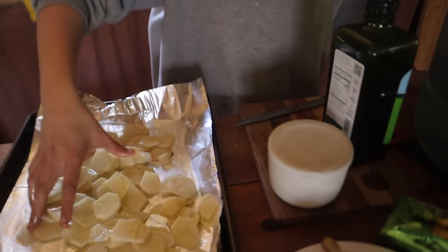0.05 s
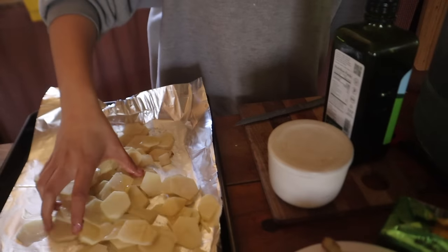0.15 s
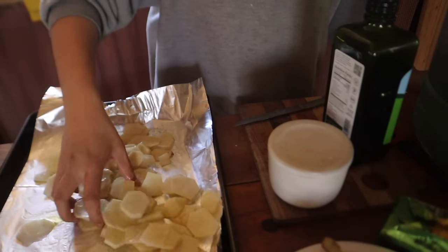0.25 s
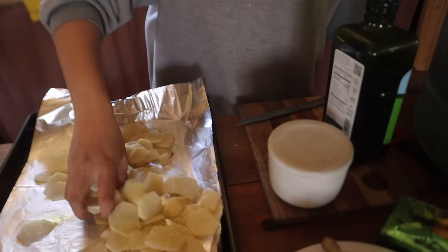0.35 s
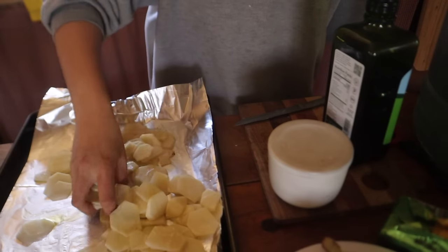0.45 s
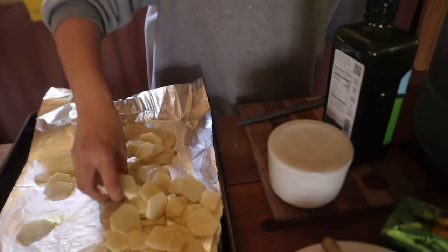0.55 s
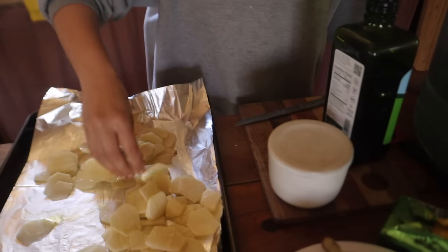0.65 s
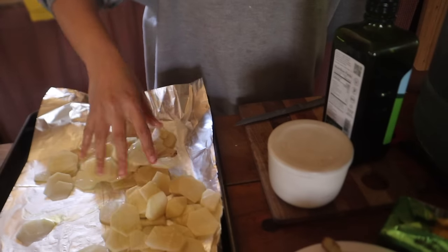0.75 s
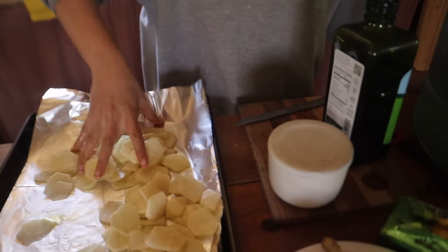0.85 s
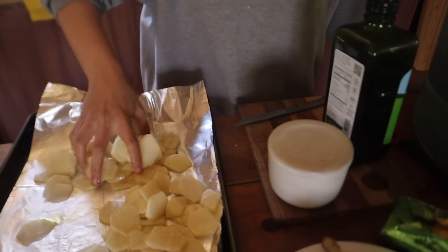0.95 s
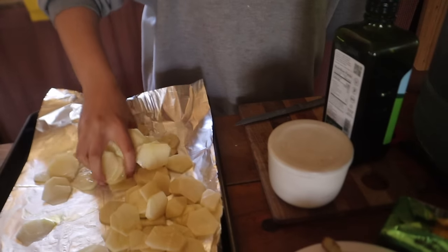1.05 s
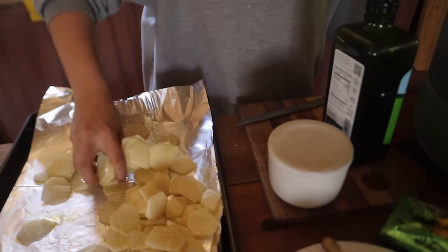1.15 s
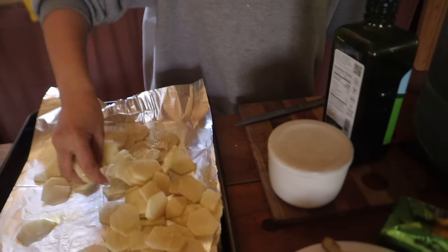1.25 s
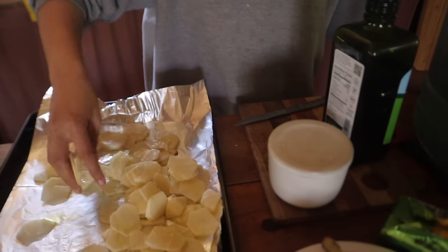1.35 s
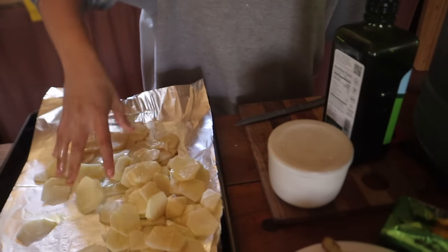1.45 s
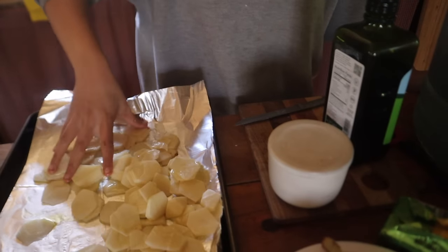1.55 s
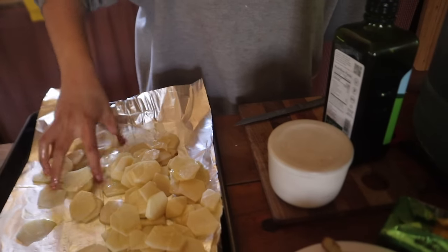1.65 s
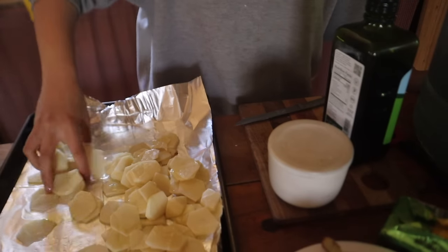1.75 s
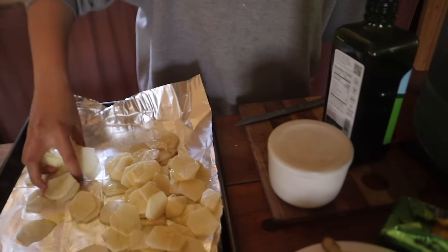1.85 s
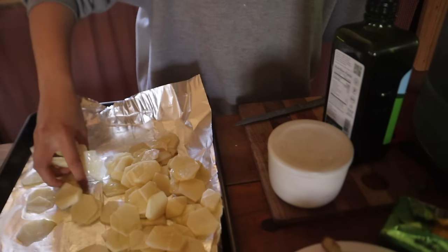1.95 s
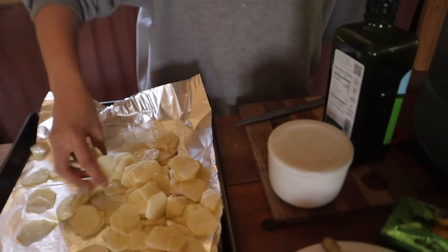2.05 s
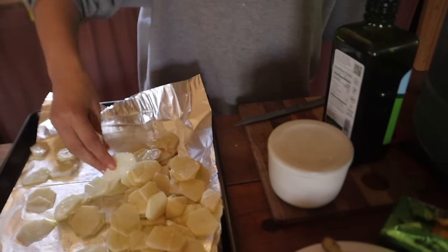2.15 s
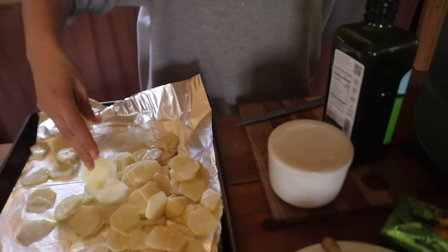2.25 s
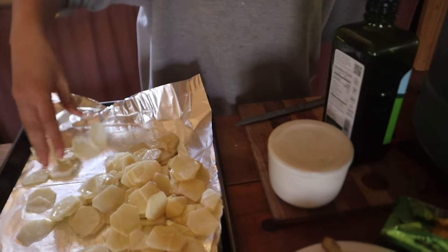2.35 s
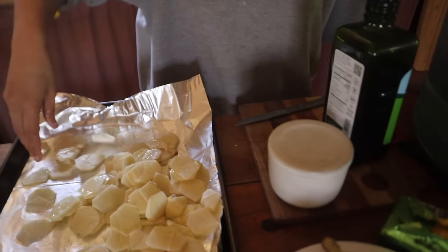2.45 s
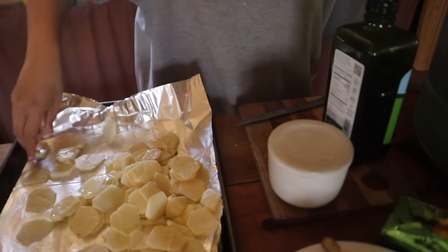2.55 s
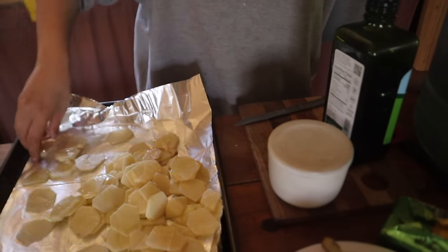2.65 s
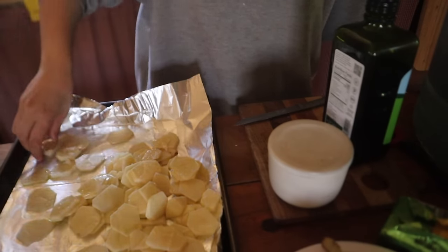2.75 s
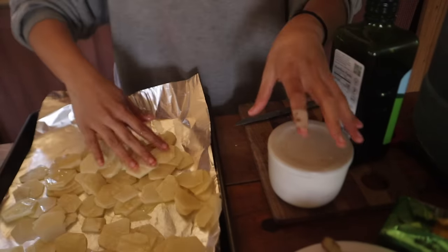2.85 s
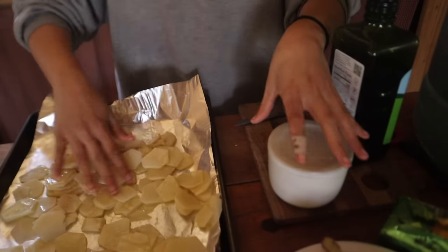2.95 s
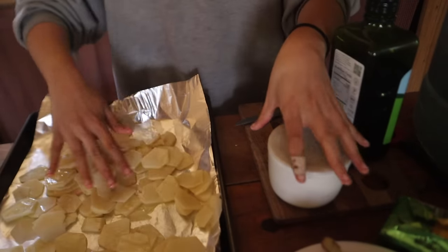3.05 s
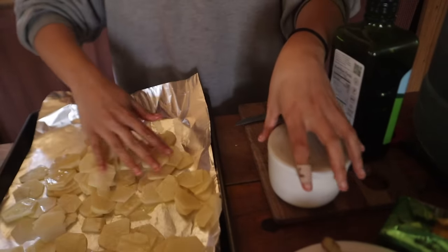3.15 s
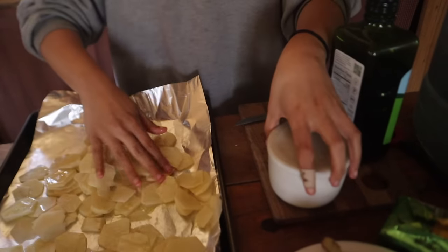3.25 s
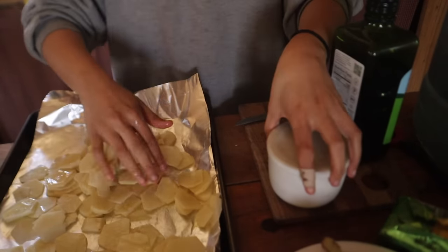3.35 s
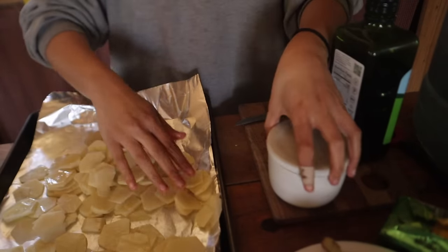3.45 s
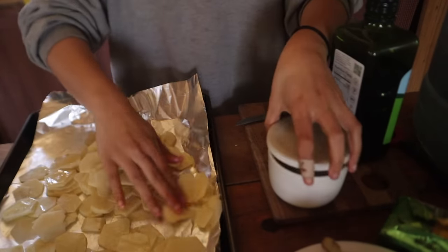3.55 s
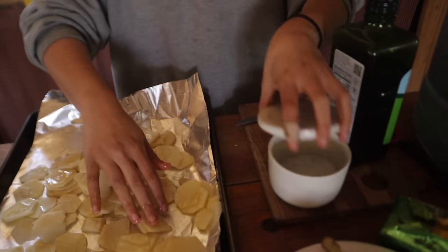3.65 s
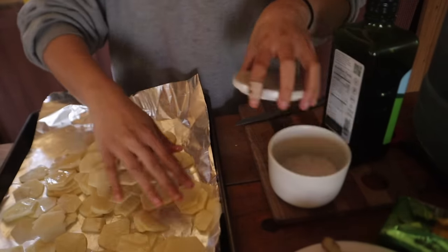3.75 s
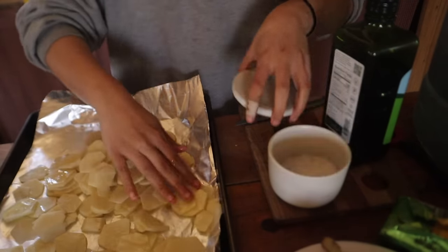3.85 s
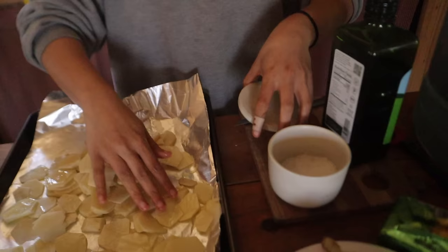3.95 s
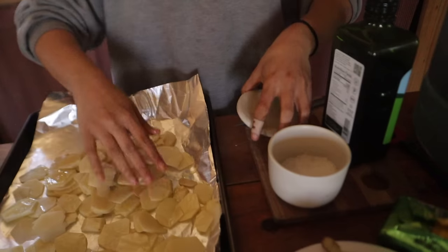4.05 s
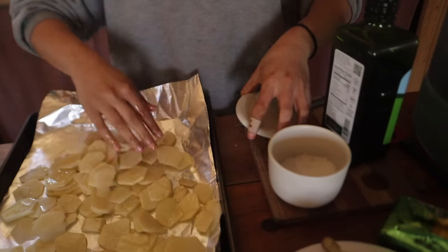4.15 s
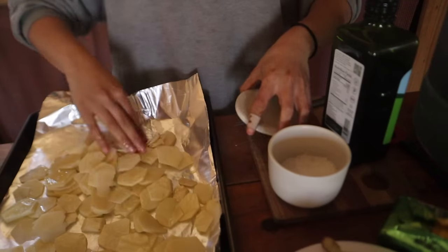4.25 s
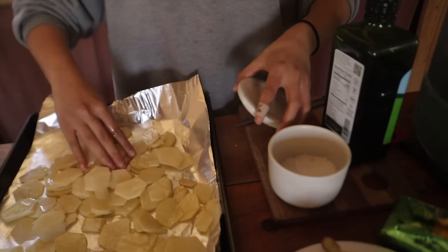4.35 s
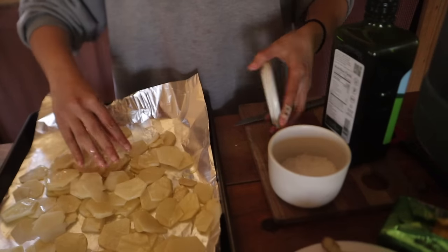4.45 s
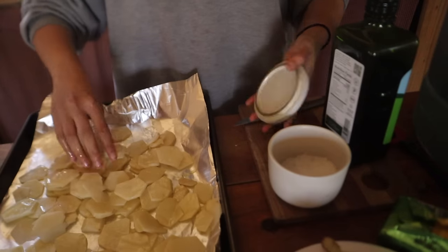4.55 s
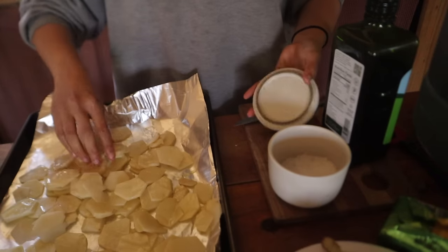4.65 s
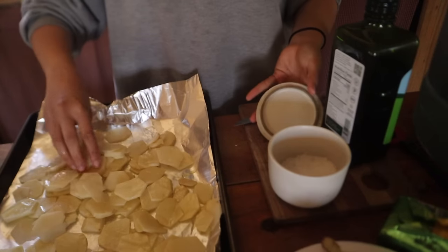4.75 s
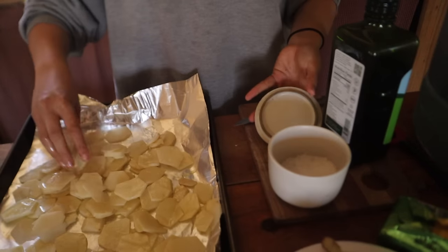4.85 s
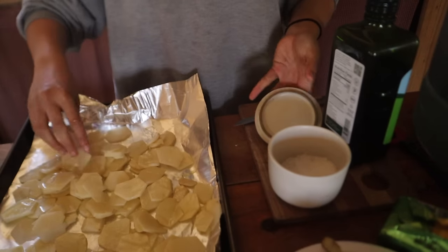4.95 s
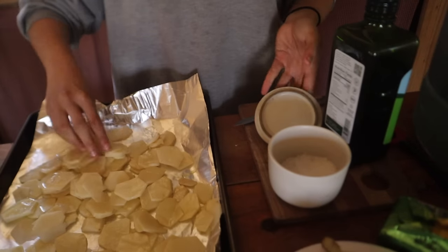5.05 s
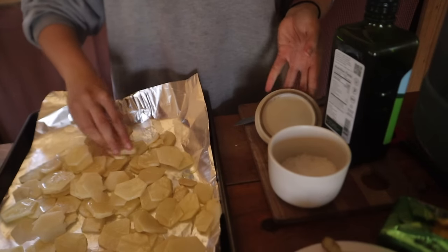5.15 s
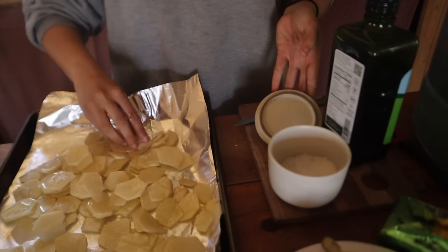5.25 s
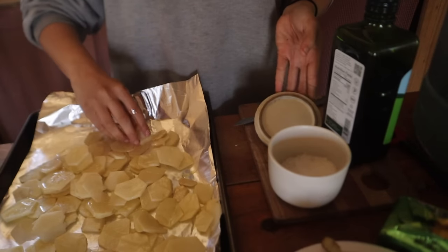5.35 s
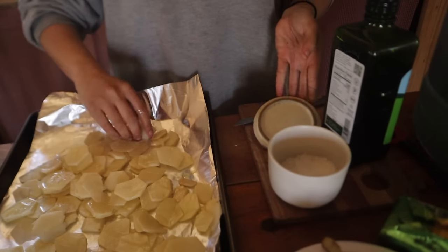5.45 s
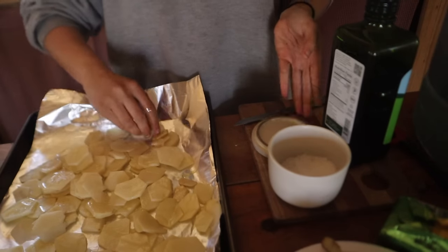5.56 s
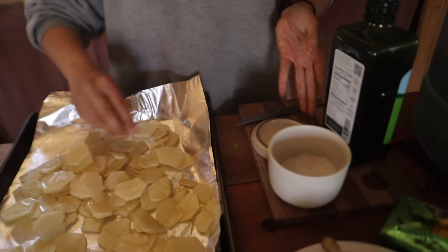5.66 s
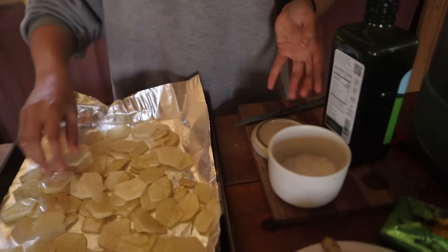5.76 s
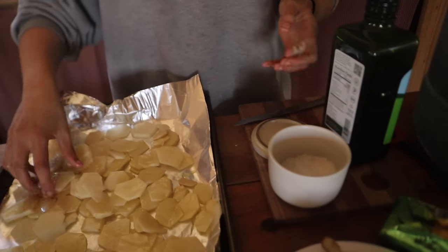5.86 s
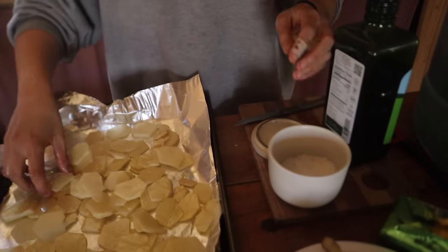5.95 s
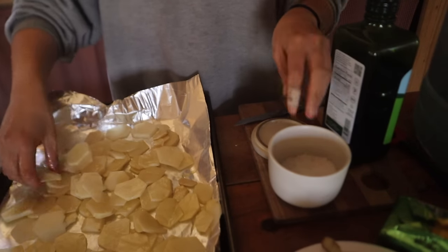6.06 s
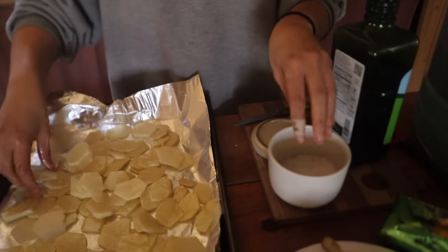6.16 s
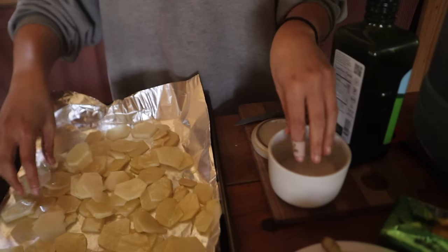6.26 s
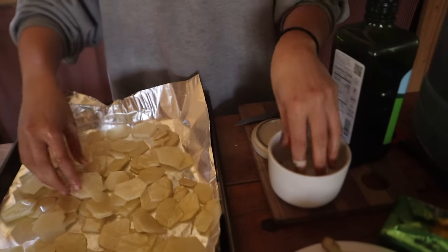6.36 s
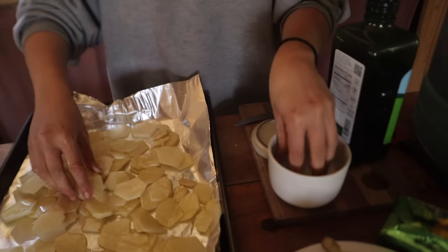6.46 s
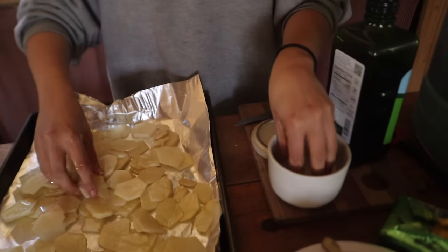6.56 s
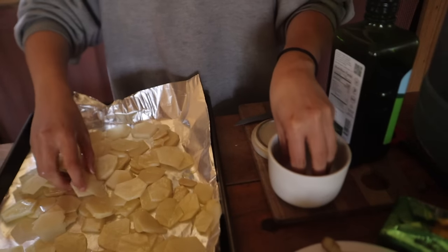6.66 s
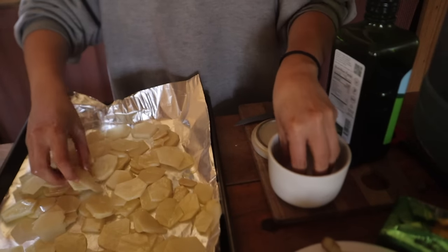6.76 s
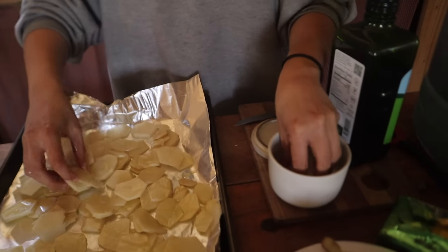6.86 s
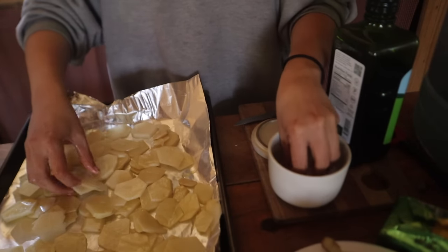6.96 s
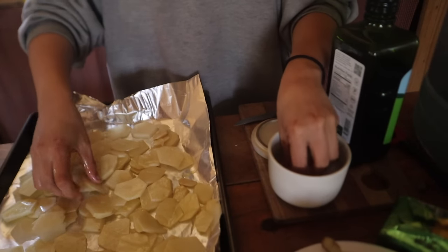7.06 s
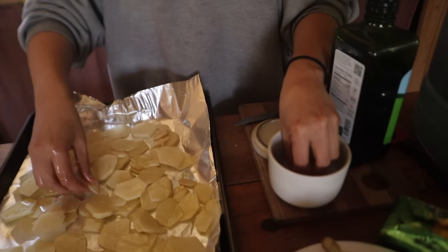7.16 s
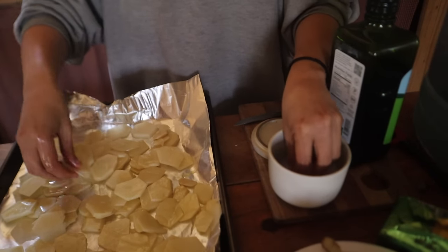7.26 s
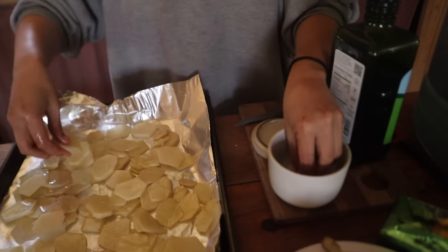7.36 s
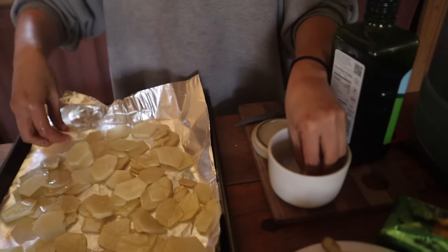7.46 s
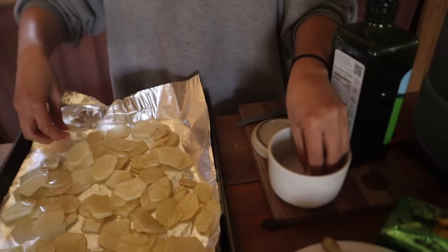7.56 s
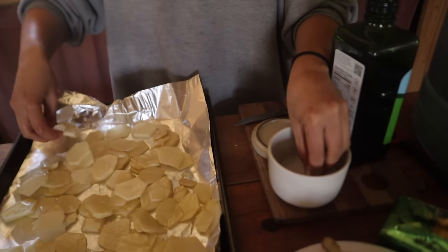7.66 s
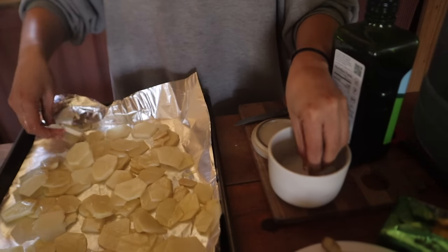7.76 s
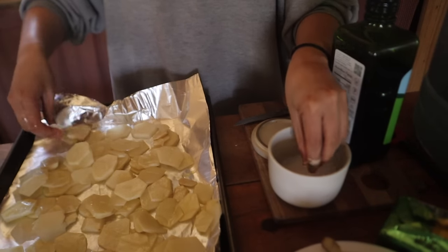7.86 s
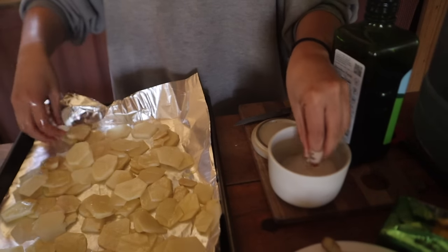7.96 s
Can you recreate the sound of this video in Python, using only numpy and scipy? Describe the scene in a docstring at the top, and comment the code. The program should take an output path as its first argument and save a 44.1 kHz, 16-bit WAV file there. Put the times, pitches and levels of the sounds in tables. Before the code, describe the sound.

A small, fairly dry kitchen, heard close in stereo over a soft, steady hush. From 0 s, a hand slides oiled potato slices on aluminum foil to one side: light ticks first, then a strong crinkling burst at 0.9-1.1 s with a hollow baking-sheet thump, and more crackling at 1.4-2.0 s. Separate snaps follow near 2.45, 2.7 and 2.95 s, a low bump at 3.06, crackles at 3.55-4.0, and a deep sheet thump at 4.47. At 4.8 s, on the other side, a ceramic lid clinks brightly on its bowl, with a quick wooden knock. Faint foil rustles and a slight rim scrape lead to a loud flat clap on the wooden board at 5.63. It calms: a soft bump at 6.0, faint gritty salt digging with tiny crunches around 6.7-7.2, near quiet, then sharp foil crackling from 7.8 to the end.

```python
"""Aluminium foil buckles and crackles as a hand spreads oiled potato slices over it; the baking sheet thumps.
The other hand clinks a ceramic lid on a salt bowl, slides it and drops it flat on a wooden board, then digs salt.
Foil and salt are sparse random impulses through spectra; blows are filtered bursts; rings are dying sines.
All is placed in a small kitchen at two microphone ports over a steady hush, then limited, clipped and low-passed."""
import sys
import numpy as np
from scipy import signal
from scipy.fft import rfft, irfft
from scipy.io import wavfile
from scipy.ndimage import uniform_filter1d, minimum_filter1d

SR = 44100
rng = np.random.default_rng(int(sys.argv[2]) if len(sys.argv) > 2 else 0)


def to_wav(s):
    """Save 16-bit WAV."""
    ch = np.atleast_2d(s).T  # columns
    pcm = np.round(np.clip(ch, -1, 1) * 32767)  # PCM
    wavfile.write(sys.argv[1], SR, pcm.astype(np.int16))


N = 352800
TIME = np.arange(N) / SR
TEN_MS = np.sqrt(SR / 10 ** 2)  # turns energy 1 into rms 1 over 10 ms

# Hand sliding slices over foil. Each row: start in seconds, length in seconds, level in dB,
# sizzle relative to it in dB, crack pitch as a ratio, ring of the foil patch in Hz.
STROKES = [(0.159, 0.33, -39.5, -9.5, 1.19, 2910), (0.587, 0.12, -48.5, -10, 0.97, 3800),
           (0.911, 0.17, -32, -9.5, 1.085, 2180), (1.109, 0.072, -39.5, -15, 0.86, 2170),
           (1.206, 0.12, -45, -7.5, 1.01, 3290), (1.43, 0.21, -40.5, -2, 1.26, 2610),
           (1.589, 0.372, -32.5, -9, 1.01, 2120), (1.972, 0.16, -45, -2.5, 1.08, 2920),
           (2.304, 0.3, -55.5, -18, 1, 3030), (2.715, 0.087, -47.5, -8, 1.02, 2190),
           (2.959, .15, -48, -21.5, 1.13, 2940), (3.264, .14, -45.5, -8.5, 1.04, 3400),
           (3.593, 0.12, -36.5, -31, 1.49, 3140), (3.737, 0.11, -46.5, -33, 1, 3070),
           (3.91, 0.2, -51.5, -34, 1.2, 3660), (4.359, 0.37, -56, -10, 1, 3020),
           (5.182, 0.16, -53, -9, 1.07, 2850), (5.371, 0.27, -43, -7.5, 0.97, 2540),
           (6.009, 0.14, -55, -12, 1.2, 3850), (6.191, 0.13, -53.5, -16.5, 0.85, 2280),
           (7.797, 0.14, -35.5, -11, 1.06, 2740)]
# Modes of the baking sheet. Each row: frequency in Hz, relative level in dB, t60 in seconds.
SHEET_MODES = [(113, -13.5, 0.34), (227.4, 0, 0.31), (237, -25, 0.064), (305.4, -3.5, 0.12),
               (452, -10, 0.25), (656, -17.5, 0.16), (680, -23.5, 0.29)]
# Lid striking the bowl, then its rim meeting the board. Each row: start in seconds, ceramic ring in dB,
# sharp tick in dB, wooden knock in dB.
LID_HITS = [(4.7883, 5.5, -7.5, -15), (4.8115, -22, -17, 0), (4.823, -30, -24, -7)]
# Lid falling on the board, one edge just ahead of its face. Each row: start in seconds, relative level in dB.
LID_FALL = [(5.629, -10.5), (5.6311, 4.5)]
# Dull spectrum of rubbing, for the lid's rim and the digging. Each row: frequency in Hz, level in dB.
RUB = [(60, -9.5), (230, 17.5), (450, 15.5), (1000, 5.5), (2200, -6.5), (4000, 0.5), (8000, -32.5),
       (14000, -42.5)]


def amp(db):
    """Decibels to gain."""
    return np.exp(np.asarray(db) * (np.log(10) / 20))


def evened(x):
    """Scales to rms 1."""
    return x / np.sqrt(np.mean(x ** 2) + 1e-20)


def unit(x):
    """Scales to energy 1 in each channel."""
    return x / np.sqrt(np.sum(x ** 2, -1, keepdims=True) + 1e-20)


def read(points, hz):
    """Interpolates a curve on a log-frequency axis."""
    f, value = np.transpose(points)
    return np.interp(np.log(hz + 1), np.log(f), value)


def pitched(spectrum, ratio):
    """The same spectrum moved up or down in pitch."""
    return [(hz * ratio, db) for hz, db in spectrum]


def add(mix, start_s, sound):
    """Adds a sound to the mix in place."""
    part = mix[max(round(start_s * SR), 0):][:len(sound)]
    part += sound[:len(part)]


def blows(starts_s, levels_db, sound):
    """Plays one sound at each time and level."""
    out = np.zeros(N)
    for start_s, gain in zip(starts_s, amp(levels_db)):
        add(out, start_s, gain * sound)
    return out


def through(x, response):
    """Convolves, channel by channel."""
    return signal.oaconvolve(np.atleast_2d(x), np.atleast_2d(response), axes=1)[:, :N]


def click(spectrum, size=4096):
    """Minimum-phase impulse with this spectrum, energy 1."""
    hz = abs(np.fft.fftfreq(size, 1 / SR))
    log_gain = np.log(amp(read(spectrum, hz)))
    response = np.exp(np.conj(signal.hilbert(log_gain)))
    return unit(np.fft.ifft(response).real[:size // 2])


def ring(modes, contact_s=0.00021):
    """Dying sines of a struck object, rising over the time of contact."""
    t = TIME[:SR]
    sines = sum(amp(db - 60 * t / t60_s) * np.sin(2 * np.pi * hz * t) for hz, db, t60_s in modes)
    return (1 - np.exp(-t / contact_s)) * sines


def thud(spectrum, dying_s, rattle):
    """A blow followed by the crowded, quickly dying modes of what it hits; 0 dB over 10 ms."""
    t = TIME[:SR // 5]
    body = rattle * unit(rng.standard_normal(len(t)) * np.exp(-t / dying_s))
    body[0] += 1
    return TEN_MS * unit(signal.fftconvolve(body, click(spectrum)))


def cracks(size, per_s, spread_db):
    """Sparse impulses of either sign, most small and a few large."""
    at = np.flatnonzero(rng.random(size) < per_s / SR)
    draw = rng.uniform(-1, 1, size)[at]
    out = np.zeros(size)
    out[at] = np.sign(draw) * amp(spread_db * np.minimum(-np.log(abs(draw) + 1e-9), 4))
    return out


def crackle(per_s, spread_db):
    """A continuous stream of cracks with its local power evened."""
    x = cracks(N, per_s, spread_db)
    return x / np.sqrt(abs(uniform_filter1d(x ** 2, size=2500)) + 0.0026)


def diffuse(size, envelope=1):
    """Two-channel noise, alike in the bass and less so above."""
    # Left-right likeness. Each row: frequency in Hz, correlation.
    likeness = [(100, .99), (250, .92), (500, .65), (1200, .25), (2500, 0), (6000, -.3), (12000, -.7)]
    a, b = rfft(envelope * rng.standard_normal((2, size)))
    alike = np.clip(read(likeness, np.fft.rfftfreq(size, 1 / SR)), -1, 1)
    return irfft(np.array([a, alike * a + np.sqrt(1 - alike ** 2) * b]), size)


def kitchen(x, side, near_db, near_s, room_db, size=256):
    """Direct sound at the two ports, quick scatter from the worktop, then the room's tail."""
    # Phase lead of the left port at side 1. Each row: frequency in Hz, lead in radians.
    port_lead = [(20, 0.034), (120, .15), (400, 1.3), (1500, 1.2), (2900, 1.65), (4500, 1.6), (8000, 2.21),
                 (12000, 2.47)]
    # Decay of the kitchen. Each row: frequency in Hz, t60 in seconds.
    room_t60 = [(100, 0.65), (250, 0.6), (1000, 0.29), (3000, 0.31), (6000, 0.2), (14000, 0.026)]
    lead = side * read(port_lead, np.fft.rfftfreq(size, 1 / SR))
    direct = np.roll(irfft(np.exp(.5j * np.array([lead, -lead]))), size // 4, 1)
    t = TIME[:SR // 2]
    near = unit(diffuse(len(t), np.exp(-t / near_s)) * (t < t[-1] / 2))
    hz, frame_s, z = signal.stft(diffuse(len(t)), SR, nperseg=size)
    decay = amp(-60 * frame_s / read(room_t60, hz)[:, None])
    tail = signal.istft(z * decay, SR, nperseg=size)[1][:, :len(t)]
    tail = unit(tail * np.minimum(t / 0.02, 1))
    response = amp(near_db) * near + amp(room_db) * tail
    response = np.pad(response, ((0, 0), (size // 4, 0)))
    response[:, :size] += direct
    return signal.oaconvolve(x.reshape(1, N), unit(response), axes=1)[:, size // 4:][:, :N]


def room_tone(level_db=-52):
    """The steady hush of the kitchen: shaped diffuse noise."""
    # Each row: frequency in Hz, relative density in dB per Hz.
    hush = [(25, -20), (45, -22.5), (62, 0), (110, -4), (230, -5.5), (400, -10.5), (700, -11.5),
            (1100, -15.5), (2200, -18.5), (5000, -25.5), (11000, -32.5), (14000, -72)]
    return amp(level_db) * evened(through(diffuse(N), click(hush)))


def pressure(attack_s=0.011, release_s=0.018):
    """Gain of the hand's strokes over time, for the crackle and for its sizzle."""
    gain, bright = np.zeros((2, N))
    t = TIME[:SR]
    for start_s, length_s, db, sizzle_db, *_ in STROKES:
        fade = np.exp(-np.maximum(t - length_s, 0) / release_s)
        stroke = amp(db) * np.minimum(t / attack_s, 1) * fade
        add(gain, start_s, stroke)
        add(bright, start_s, amp(sizzle_db) * stroke)
    return gain, bright


def small_buckles(gain, bright, count=70, dying_s=0.006):
    """Chance buckles that follow the level and brightness of the stroke under way."""
    place, strength, crisp = rng.uniform(-0.65, 1, (count, 3)).T
    moving = np.cumsum(gain > amp(-60))
    at = np.searchsorted(moving, (np.arange(count) + .5 + .5 * place) / count * moving[-1])
    db = 20 * np.log10(gain[at] + 1e-9) - 7 - 4 * strength
    sizzle_db = 20 * np.log10((bright[at] + 1e-9) / (gain[at] + 1e-9)) + 14 + 7 * crisp
    return list(zip(at / SR, db, np.full(count, dying_s), sizzle_db))


def facets(burst, ring_s, ring_share, size=256):
    """The cracks ring a small facet of foil for a millisecond or so; energy 1."""
    facet = ring_share * unit(rng.standard_normal(size) * np.exp(-TIME[:size] / ring_s))
    facet[0] += 1
    return unit(np.convolve(burst * rng.choice([-1, 1], len(burst)), facet))


def patches(drive, reach_s=0.048, ring_q=5.4, ring_gain=0.5):
    """Each stroke works another patch of foil: wide slack patches crack lower, tight ones higher."""
    # Spectrum of a foil crack. Each row: frequency in Hz, level in dB.
    crack_spectrum = [(600, -26), (1200, -8.5), (1800, 1), (3200, -1), (4200, -2.5), (5600, -7.5),
                      (7000, -13.5), (12000, -51)]
    starts_s, *_, pitches, rings_hz = np.transpose(STROKES)
    patch = np.searchsorted(starts_s[1:] - reach_s, TIME)  # the hand arrives just before it slides
    out = np.zeros(N)
    for k, (pitch, hz) in enumerate(zip(pitches, rings_hz)):
        crack = click(pitched(crack_spectrum, pitch), size=1024)
        resonance = signal.lfilter(*signal.iirpeak(hz, ring_q, fs=SR), crack)
        crack = unit(crack + ring_gain * resonance)
        add(out, np.argmax(patch == k) / SR, signal.fftconvolve(drive[patch == k], crack))
    return out


def foil(snap=1.2, slide_db=-1, catch_db=3, slide_hollow_db=-12, sizzle_db=2):
    """Each buckle is a snap and a dying avalanche of tiny cracks; sliding keeps a fine crackle going."""
    # Foil giving way. Each row: start in seconds, level over 10 ms in dB, dying time in seconds,
    # sizzle relative to the level in dB.
    buckles = [(0.047, -35.5, 0.0036, 4), (.054, -33, 0.015, 1.5), (.18, -48, 0.0017, -10),
               (.338, -31.5, 0.0022, -9), (0.35, -36, 0.0046, 0), (0.409, -41.5, 0.0022, 7),
               (0.485, -40, 0.00074, -5), (0.5167, -25, 0.0015, 0.5), (.613, -44, .001, -6),
               (0.6535, -55, 0.0017, 9.5), (0.666, -62, 0.00077, 1), (0.6856, -35, 0.0045, 4),
               (.822, -37.5, 0.0027, -5), (0.8474, -30, 0.01, -1), (0.9066, -19, 0.0035, -3),
               (0.928, -16, 0.0096, -1), (.944, -16.5, 0.012, -4.5), (0.9867, -19.5, 0.021, -2),
               (1.0352, -19.5, 0.0084, -24), (1.062, -32.5, 0.0035, -1), (1.158, -36.5, 0.0055, -7),
               (1.18, -34, 0.0023, -4), (1.2136, -51.5, 0.0022, 19), (1.3683, -34.5, 0.0028, -25),
               (1.4058, -24, 0.0053, 0.5), (1.414, -22.5, 0.016, -2), (1.452, -24, 0.0094, -2.5),
               (1.5123, -41, 0.0014, 16), (1.581, -37, 0.0026, -15), (1.602, -35, 0.0063, 5),
               (1.617, -35, 0.0042, 6), (1.647, -25.5, 0.018, -6), (1.679, -40, 0.0087, 4),
               (1.7695, -30, 0.0022, -1.5), (1.777, -25.5, 0.012, -11), (1.812, -33, .001, -3),
               (1.821, -20, 0.0044, -4), (1.8545, -24.5, 0.001, 1), (1.9123, -22, 0.0028, -4),
               (1.9553, -22, 0.0058, -1), (2.3174, -36.5, 0.0077, -5), (2.383, -35.5, 0.003, -3),
               (2.443, -27.5, 0.0083, 3), (2.4513, -18.5, 0.0045, -5.5), (2.49, -26.5, 0.0047, -4.5),
               (2.531, -33, 0.0064, -3.5), (2.587, -44, 0.002, 6.5), (2.662, -41, 0.0053, -2),
               (2.684, -30, 0.0075, -37), (2.694, -21.5, 0.0069, -4.5), (2.924, -29, 0.0055, -3.5),
               (2.931, -21, 0.013, -4.5), (2.955, -27, 0.0089, -8), (3.02, -34.5, 0.0033, -0.5),
               (3.251, -39.5, 0.0034, 7), (3.295, -37.5, 0.0089, -1), (3.4073, -37.5, 0.00013, 3),
               (3.519, -43, 0.0013, -5), (3.567, -20, 0.0068, -6.5), (3.613, -25.5, 0.0095, -3.5),
               (3.664, -37, 0.016, 0.5), (3.809, -38, 0.0062, -19), (3.911, -30, 0.0054, -4),
               (3.941, -30, 0.00037, -12), (3.944, -29.5, 0.014, -15), (3.9705, -37, 0.0005, -3),
               (4.0419, -37, 0.0078, -34), (4.094, -42, 0.0048, -27), (4.32, -44, 0.0051, -8),
               (4.364, -50, 0.0019, -3), (4.387, -55.5, 0.002, 10.5), (4.403, -41.5, 0.0025, -27),
               (4.4294, -42.5, 0.0013, 5), (4.4715, -32.5, 0.013, -38), (4.545, -34.5, 0.014, -36),
               (4.602, -32.5, 0.01, -27), (5.239, -43.5, 0.0033, 4), (5.27, -40.5, 0.0036, -8),
               (5.3497, -31.5, 0.005, -9), (5.4408, -29.5, 0.0092, -22), (5.538, -32, 0.024, -27),
               (5.548, -30, 0.00064, -3.5), (5.8967, -41, 0.009, -14.5), (6.034, -43.5, 0.0034, -14),
               (6.079, -43.5, 0.00084, -24), (6.293, -50, 0.0023, 0), (7.7063, -44.5, 0.003, -1.5),
               (7.79, -26, 0.012, -4), (7.797, -18, 0.01, -2), (7.83, -19.5, 0.013, -3.5),
               (7.876, -21, 0.008, -6), (7.882, -21, 0.0074, -2.5), (7.897, -29.5, 0.0075, -6),
               (7.966, -31.5, 0.009, -18)]
    # Bright part of a crack. Each row: frequency in Hz, level in dB.
    sizzle_spectrum = [(3500, -11), (6000, 0.5), (8000, 0), (11000, 2.5), (12500, -6), (14500, -19.5),
                       (16000, -45)]
    # The sheet's hollow answer. Each row: frequency in Hz, level in dB.
    hollow_spectrum = [(70, -5.5), (150, -8.5), (230, 7.5), (330, -9), (600, 0), (1200, -3.5), (1800, -7.5),
                       (3500, -65), (12000, -76.5)]
    gain, bright = pressure()
    catching = evened(uniform_filter1d(rng.standard_normal(N), size=260))  # slices catch and slip
    slide = amp(slide_db) * evened(crackle(per_s=800, spread_db=2.0) * amp(catch_db * catching))
    gains = (gain, bright, gain * amp(slide_hollow_db))
    drives = [slide * rng.choice([-1, 1], N) * g for g in gains]  # crack, sizzle, hollow
    t = TIME[:SR // 8]
    for start_s, db, dying_s, bright_db in list(buckles) + small_buckles(gain, bright):
        hollow_db = -24.5 - 0.02 * (db + 30)  # slightly weaker for louder buckles
        swell = 1 - np.exp(-(t + 0.000087) / (0.3 * dying_s))  # long avalanches gather more slowly
        envelope = swell * np.exp(-t / (2 * dying_s))
        burst = unit(cracks(len(t), per_s=2000, spread_db=3.5) * envelope)
        burst[0] += snap * np.exp(-dying_s / 0.0061)  # the shorter the buckle, the stronger its snap
        for drive, part_db in zip(drives, (0, bright_db, hollow_db)):
            sound = facets(burst, ring_s=0.00077, ring_share=0.41)
            add(drive, start_s, amp(db + part_db) * TEN_MS * sound)
    sizzle = amp(sizzle_db) * through(drives[1], click(sizzle_spectrum, size=1024))
    hollow = through(drives[2], click(hollow_spectrum, size=1024))
    return patches(drives[0]) + sizzle + hollow


def wandering(x, moves_per_s=130, count=3):
    """The crackle moves on at random moments through a few spots in turn, each with its own reflections."""
    spot = np.cumsum(rng.random(N) < moves_per_s / SR) % count
    sides = np.linspace(.82, 1.2, count)
    return sum(kitchen(x * (spot == k), side, near_db=-2.0, near_s=0.0057, room_db=-11.0)
               for k, side in enumerate(sides))


def sheet_hum(rubbed_db=-16.5, dug_db=-2):
    """Noise excites the sheet's modes, under the strokes and through the table under the digging."""
    effort = amp(rubbed_db) * pressure()[0] + amp(dug_db + digging_db())
    return through(rng.standard_normal(N) * effort, unit(ring(SHEET_MODES)))[0]


def sheet(bounce_t60_s=0.075, detune_share=0.018):
    """Landings bounce the sheet under the finger, ring and slap it; stiff slice edges knock."""
    # Fingers and slices landing. Each row: start in seconds, bounce in dB, bounce in Hz, sheet ring in dB,
    # ring length as a ratio, slap in dB, slap pitch as a ratio.
    thumps = [(.37, -37, 100, -41, 0.48, -45, 1.4), (0.693, -46, 149, -45, .7, -41, 0.55),
              (0.721, -37.5, 127, -40.5, 1.3, -38, 0.69), (.93, -34, 130, -37, 0.63, -49, 0.84),
              (1.035, -26, 149, -24, 0.63, -23.5, 0.73), (1.247, -30, 131, -27, 0.9, -29.5, 0.86),
              (1.413, -39, 120, -30, 0.57, -35.5, 1.24), (2.064, -26.5, 125, -34, 0.85, -33, 0.49),
              (2.452, -48, 130, -27.5, 0.86, -23.5, 0.78), (2.971, -38, 110, -36.5, 0.4, -44.5, 1.1),
              (3.063, -19, 113, -27.5, 0.51, -39, 0.71), (3.19, -32, 132, -42, 0.37, -53, 0.52),
              (3.302, -41, 109, -46, 0.81, -38.5, 1.66), (3.525, -27, 113, -34.5, 0.47, -41, 0.45),
              (3.836, -31.5, 116, -38, 0.67, -46, 0.72), (4.471, -17.5, 95, -21, 0.55, -29, 0.82),
              (6.0, -29, 91, -46, 1.7, -37, 1.17), (7.086, -35, 65, -52, 0.7, -60, 0.41),
              (7.831, -50, 130, -38, 1.5, -35, 0.82), (7.875, -46, 127.7, -39, 0.92, -50, 0.4)]
    # Spectrum of a slap. Each row: frequency in Hz, level in dB.
    slap_spectrum = [(80, -20.5), (200, -7), (320, 5), (500, 4.5), (800, -10.5), (1400, -11.5),
                     (3000, -31.5), (8000, -77)]
    # Knocks of slice edges. Each row: start in seconds, level in dB.
    slice_knocks = [(0.848, -28), (1.514, -37), (2.318, -37.5), (2.445, -27.5), (2.453, -25.5),
                    (3.062, -36), (4.471, -32.5)]
    # Spectrum of an edge knock. Each row: frequency in Hz, level in dB.
    edge_spectrum = [(100, -17), (250, -0.5), (500, -3), (800, -4.5), (1050, -7.5), (1350, -5),
                     (1650, -4.5), (2400, -13.5), (8000, -38.5)]
    out = np.zeros(N)
    for start_s, bounce_db, bounce_hz, ring_db, length, slap_db, pitch in thumps:
        detune = 1 + detune_share * rng.uniform(-1, 1)  # each landing shifts the sheet's pitch
        modes = [(hz * detune, ring_db + db, t60_s * length) for hz, db, t60_s in SHEET_MODES]
        slap = thud(pitched(slap_spectrum, pitch), dying_s=0.015, rattle=0.94)
        add(out, start_s, ring([(bounce_hz, bounce_db, bounce_t60_s)], contact_s=.002))
        add(out, start_s, ring(modes, contact_s=0.003))
        add(out, start_s, amp(slap_db) * slap)
    return out + blows(*np.transpose(slice_knocks), thud(edge_spectrum, dying_s=0.025, rattle=1.0))


def lid():
    """The hard contact ticks and the board knocks; the rim scrapes before the fall."""
    # Rim sliding on the board. Each row: time in seconds, level in dB.
    lid_slide = [(5.15, -59), (5.2, -49), (5.3, -66.5), (5.43, -50.5), (5.48, -39), (5.56, -52),
                 (5.62, -37), (5.64, -74)]
    # Spectrum of the hard contact. Each row: frequency in Hz, level in dB.
    tick_spectrum = [(40, -22), (250, -12), (900, -13.5), (1800, -13), (3200, -3), (5000, -11),
                     (7000, -20.5), (10000, -41.5), (16000, -32.5)]
    # Spectrum of the wooden knock. Each row: frequency in Hz, level in dB.
    knock_spectrum = [(30, -27.5), (70, -12.5), (230, -3.5), (400, 0), (680, -4.5), (950, 13.5), (1250, 14),
                      (1550, 5.5), (2000, 9), (2700, 1.5), (4500, -53.5), (9000, -35.5), (15000, -56)]
    slide_db = np.interp(TIME, *np.transpose(lid_slide), left=-120, right=-120)
    scrape = crackle(per_s=540, spread_db=6.5) * amp(slide_db)
    out = through(scrape, click(RUB, size=1024))[0]
    for start_s, _, tick_db, knock_db in LID_HITS:
        add(out, start_s, amp(tick_db) * thud(tick_spectrum, dying_s=0.0017, rattle=0.098))
        add(out, start_s, amp(knock_db) * thud(knock_spectrum, dying_s=0.012, rattle=0.35))
    return out


def ceramic_ring():
    """Lid and bowl ring together in dying sines at each lid hit."""
    # Each row: frequency in Hz, relative level in dB, t60 in seconds.
    ceramic_modes = [(1739, -23.5, .47), (1890, -24, .24), (2516, -6, .28), (2622, -5.5, .275),
                     (2850, -12, .18), (3135, -13, .24), (3408, -24, .18), (3924, -27, .2),
                     (4190, -29.5, .33), (6280, -33, .26), (10500, -43, .2)]
    starts_s, levels_db, _, _ = np.transpose(LID_HITS)
    return blows(starts_s, levels_db, ring(ceramic_modes))


def lid_fall():
    """The lid lands flat on the board: one broad clap with a short rattle."""
    # Spectrum of the clap. Each row: frequency in Hz, level in dB.
    clap_spectrum = [(30, -22), (90, -17.5), (220, -14), (400, -8), (600, -3), (1000, 3.5), (1550, 4),
                     (2100, 1), (2600, -1), (3200, 0), (3900, -9.5), (4600, -1), (5500, -8.5), (6300, -3.5),
                     (9000, -23.5), (15000, -24.5)]
    return blows(*np.transpose(LID_FALL), thud(clap_spectrum, dying_s=0.0025, rattle=0.1))


def board_ring(level_db=-21):
    """The wooden board's modes ring under the fallen lid."""
    # Each row: frequency in Hz, relative level in dB, t60 in seconds.
    board_modes = [(120, -17, 0.64), (222.5, 2, 0.39), (251, -8, 0.83), (339, -6.5, 0.42),
                   (454, -4.5, 0.49), (729, 1.5, 0.3), (840, -10, .3), (976, 0, 0.25), (1194, -1, 0.34)]
    return amp(level_db) * blows(*np.transpose(LID_FALL), ring(board_modes))


def digging_db():
    """Effort of the fingers in the salt over time."""
    # Each row: time in seconds, effort in dB.
    digging_effort = [(6.45, -71), (6.64, -62.5), (6.7, -61), (6.74, -58.5), (6.785, -54), (6.84, -58),
                      (6.89, -51), (7.01, -52.5), (7.035, -51.5), (7.065, -48.5), (7.135, -56),
                      (7.162, -64), (7.195, -45.5), (7.27, -62.5), (7.48, -62.5), (7.7, -63)]
    return np.interp(TIME, *np.transpose(digging_effort), left=-120, right=-120)


def salt(grit_db=1.0, rub_db=-10, packing_db=-2, grip_db=1.3):
    """Grains grind between the digging fingers; now and then a clump gives way."""
    # Clumps giving way. Each row: start in seconds, crisp crunch in dB, dull packing of the grains in dB.
    salt_crunches = [(6.683, -52, -53), (6.778, -61, -49), (6.881, -61, -48.5), (6.95, -62, -51),
                     (6.997, -53, -49), (7.056, -48, -52), (7.096, -57, -58), (7.133, -45.5, -64)]
    # Spectrum of the grains' hiss. Each row: frequency in Hz, level in dB.
    grit_spectrum = [(500, -3), (1100, -7.5), (2300, -7.5), (3500, -6.5), (6000, -6.5), (11000, 0.5),
                     (13000, -11), (16000, -26.5)]
    # Spectrum of the crisp crunch. Each row: frequency in Hz, level in dB.
    crunch_spectrum = [(1500, -8), (4000, -1), (6000, -3), (8000, 2), (12000, -19)]
    # Spectrum of the dull packing. Each row: frequency in Hz, level in dB.
    packing_spectrum = [(200, -8), (500, -3.5), (1200, 2), (2400, -2.5), (4000, -15), (9000, -33)]
    grip = uniform_filter1d(uniform_filter1d(rng.standard_normal(N), size=1200), size=800)
    effort_db = digging_db() + grip_db * evened(grip)
    grains = crackle(per_s=4500, spread_db=8.5) * amp(grit_db + effort_db)
    rubbing = crackle(per_s=5400, spread_db=10.5) * amp(rub_db + effort_db)
    packing = crackle(per_s=630, spread_db=4.0) * amp(packing_db + effort_db)
    t = TIME[:SR // 10]
    clump = TEN_MS * unit(cracks(len(t), per_s=3200, spread_db=4) * np.exp(-t / 0.0065))
    starts_s, crisp_db, dull_db = np.transpose(salt_crunches)
    crisp = blows(starts_s, crisp_db, clump)
    dull = blows(starts_s, dull_db, clump)
    return (through(grains, click(grit_spectrum, size=1024))
            + through(rubbing, click(RUB, size=1024))
            + through(packing + dull, click(packing_spectrum, size=1024))
            + through(crisp, click(crunch_spectrum, size=1024)))


def bowl_brushes(level_db=-1, dying_s=0.004):
    """A finger sticks and slips on the bowl's rim, so each touch wakes the modes in another mix."""
    # Touches on the rim. Each row: start in seconds, relative level in dB.
    bowl_touches = [(6.485, -50), (6.595, -50.5), (6.678, -51), (6.703, -51), (6.775, -57)]
    # Modes of the bowl. Each row: frequency in Hz, relative level in dB, t60 in seconds.
    bowl_modes = [(2160, 2, .19), (5190, -4.5, .15), (9220, -12, .3)]
    t, out = TIME[:SR // 10], np.zeros(N)
    for start_s, db in bowl_touches:
        slips = unit(rng.standard_normal(len(t)) * t * np.exp(-t / dying_s))
        add(out, start_s, amp(level_db + db) * signal.fftconvolve(slips, ring(bowl_modes)))
    return out


def scene():
    """Foil and sheet thumps to one side; lid, bowl, board, salt and the sheet's hum to the other."""
    crackling = wandering(foil()) * amp([[.5], [-.5]])
    rings = sheet_hum() + ceramic_ring() + board_ring() + bowl_brushes()
    rings = kitchen(rings, side=-1.07, near_db=-41.5, near_s=0.004, room_db=-18) * amp([[-.7], [.7]])
    thumps = kitchen(sheet(), side=0.9, near_db=-10, near_s=0.012, room_db=-19)
    clinks = kitchen(lid(), side=-1.4, near_db=6.0, near_s=0.0061, room_db=-7.5) * amp([[-.5], [.5]])
    clap = kitchen(lid_fall(), side=-0.51, near_db=3, near_s=0.0061, room_db=-5)
    digging = kitchen(salt(), side=-1.2, near_db=0, near_s=0.005, room_db=-13.5) * amp([[-.5], [.5]])
    return room_tone() + crackling + rings + thumps + clinks + clap + digging


def limiter(x, limit_db, release_db_per_s, hold_s, size=80):
    """Power over the limit pulls the gain down within 2 ms; it holds, then recovers quickly."""
    power = signal.lfilter(np.ones(size) / size, 1, (x ** 2).mean(0))
    over_db = np.maximum(10 * np.log10(abs(power) + 1e-12) - limit_db, 0)
    hold = 2 * max(int(hold_s * SR / 2), 1) + 1
    held_db = -minimum_filter1d(-over_db, hold, origin=hold // 2)
    fall_db = TIME * release_db_per_s
    cut_db = np.maximum.accumulate(held_db + fall_db) - fall_db
    return x * amp(-uniform_filter1d(cut_db, size))


def record(dry):
    """Limiter, clipping at full scale and a low-pass at the band limit."""
    ducked = limiter(dry, limit_db=-6, release_db_per_s=286.0, hold_s=0.045)
    low_pass = signal.firwin(255, 16200, window=("kaiser", 9), fs=SR)  # Hz
    return signal.oaconvolve(np.clip(ducked, -1, 1), low_pass[None], "same")


dry = scene()
out = record(dry)
to_wav(out)
```